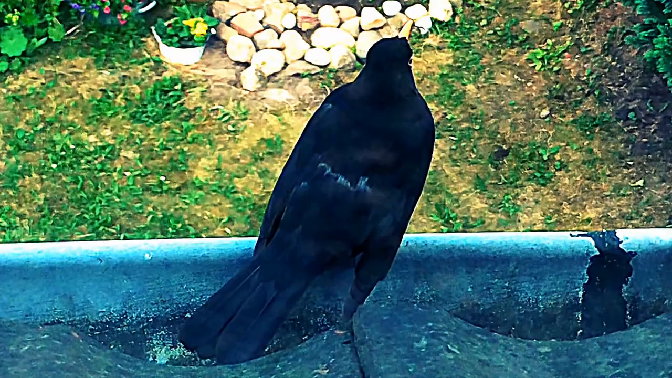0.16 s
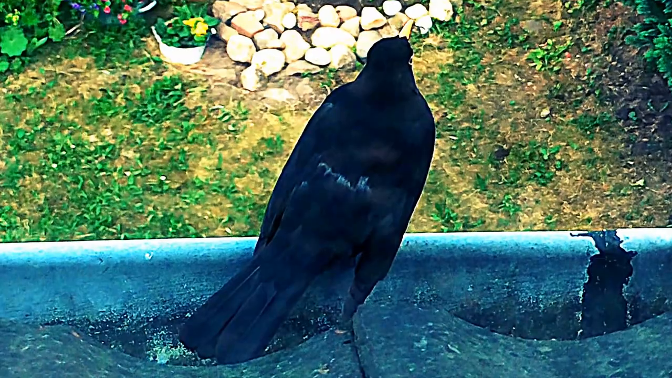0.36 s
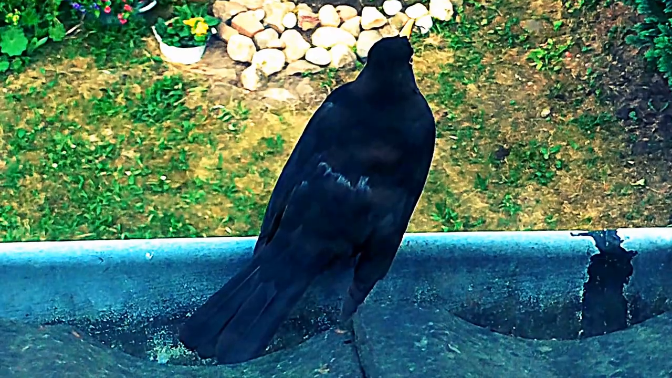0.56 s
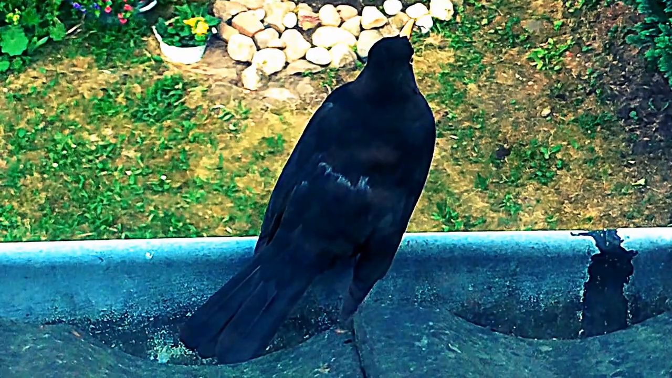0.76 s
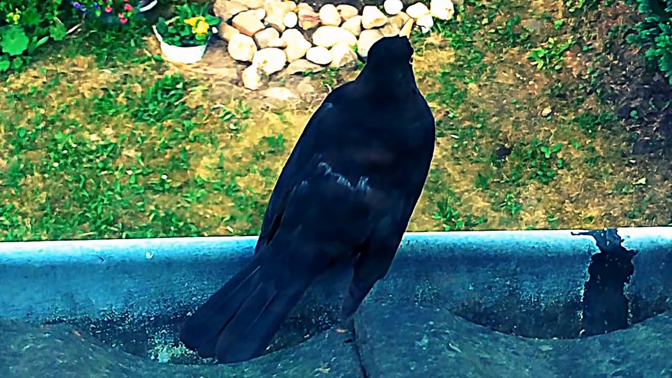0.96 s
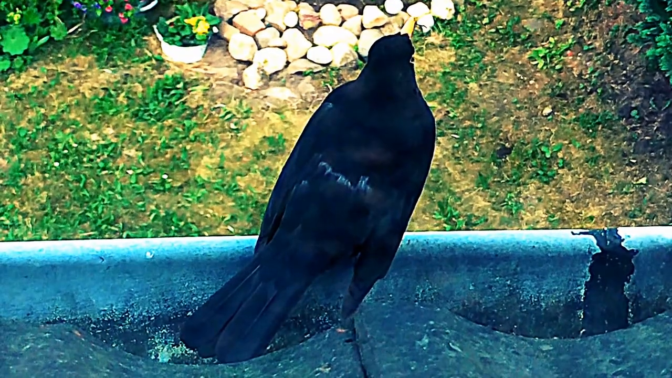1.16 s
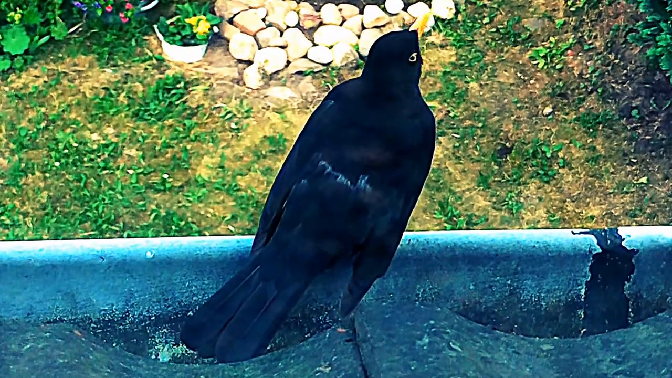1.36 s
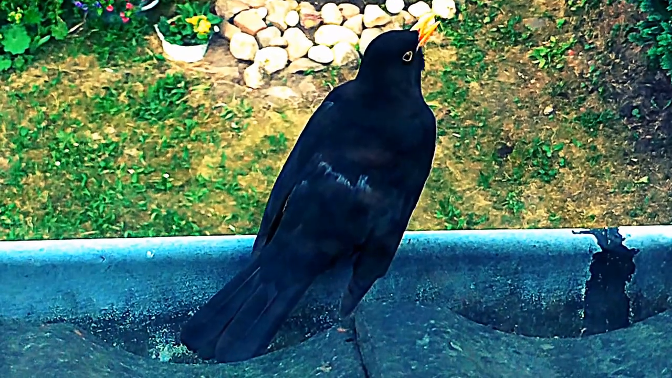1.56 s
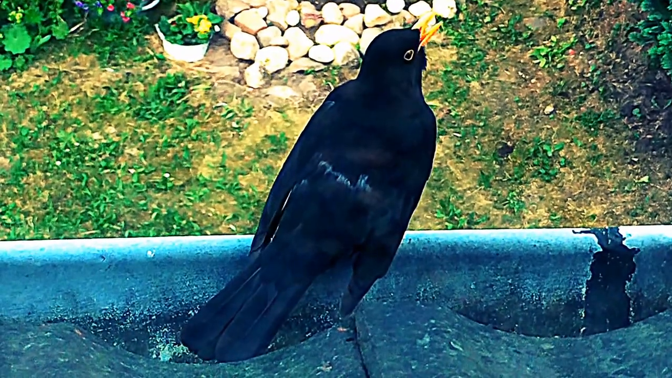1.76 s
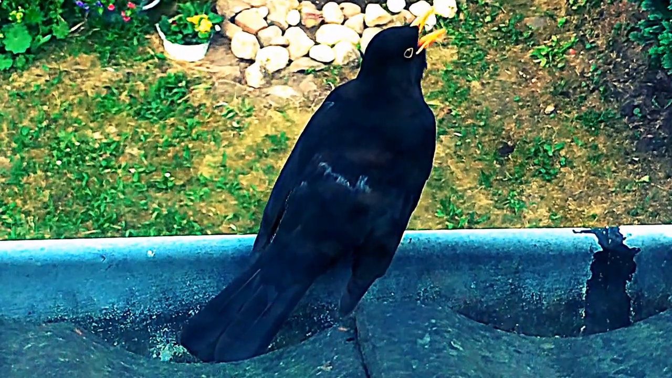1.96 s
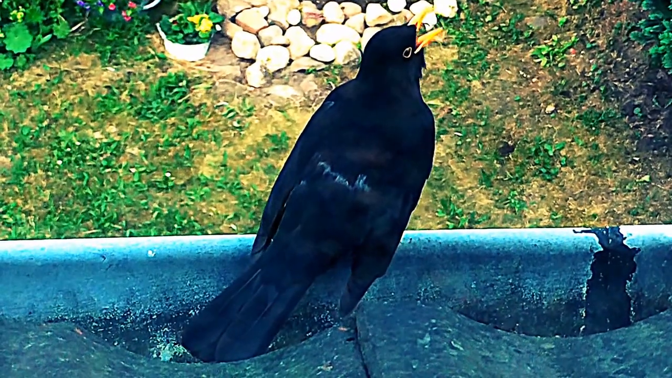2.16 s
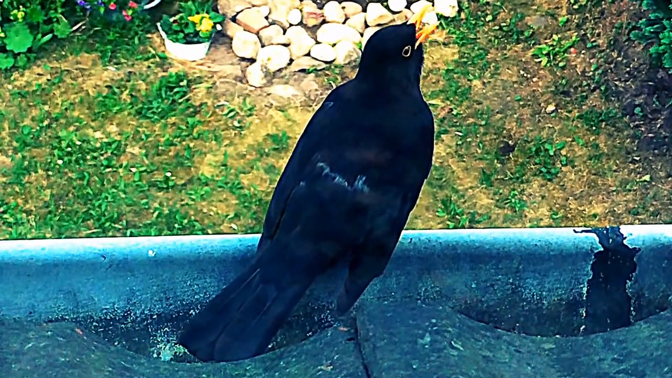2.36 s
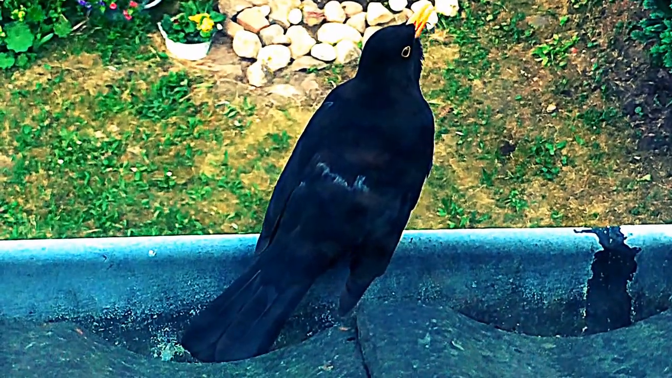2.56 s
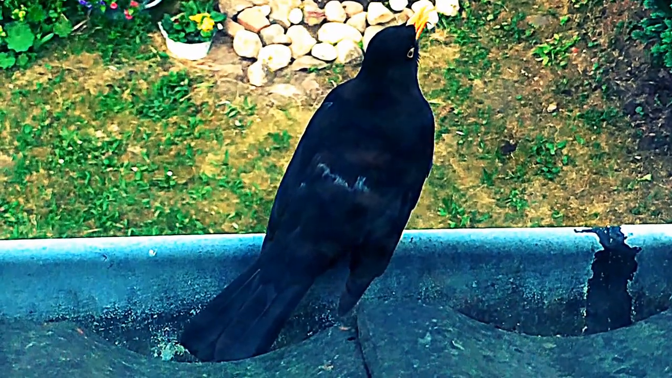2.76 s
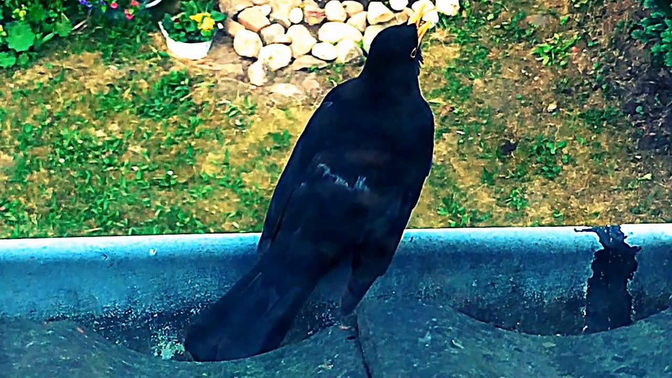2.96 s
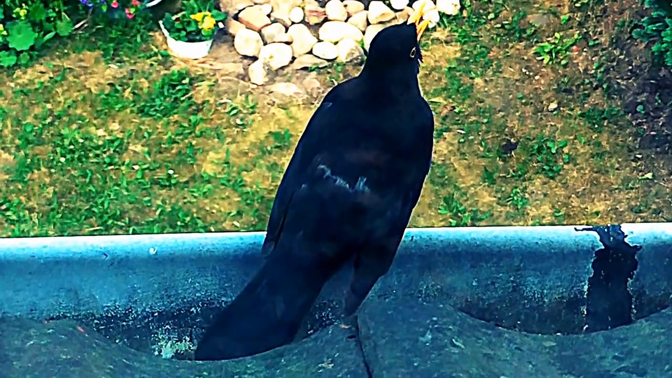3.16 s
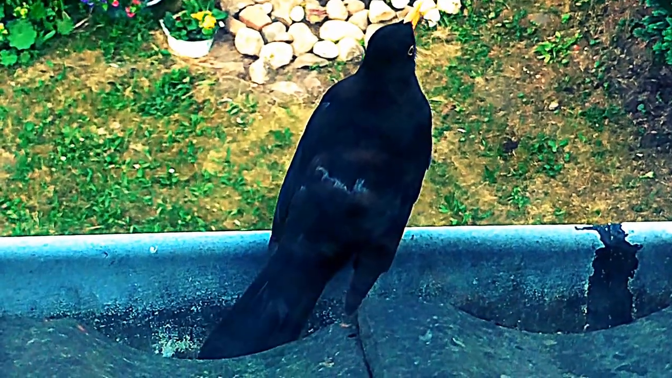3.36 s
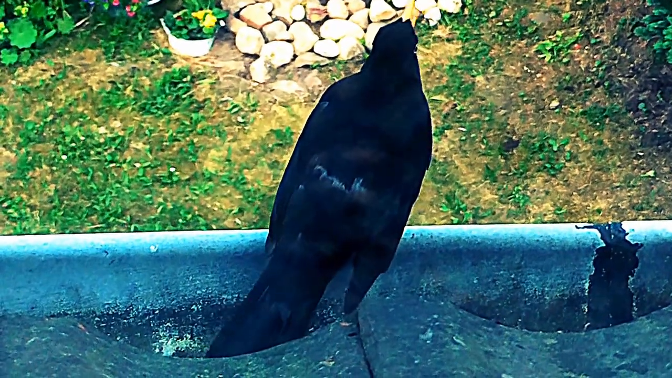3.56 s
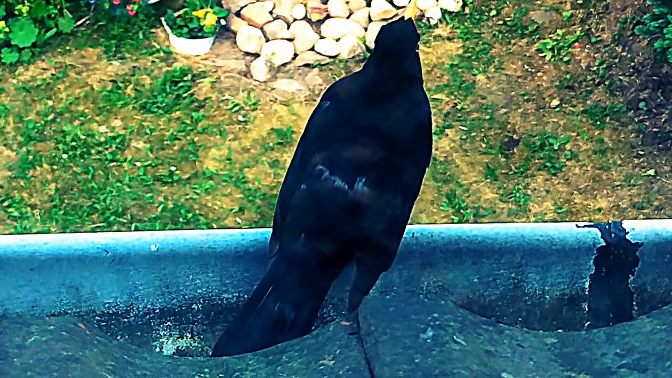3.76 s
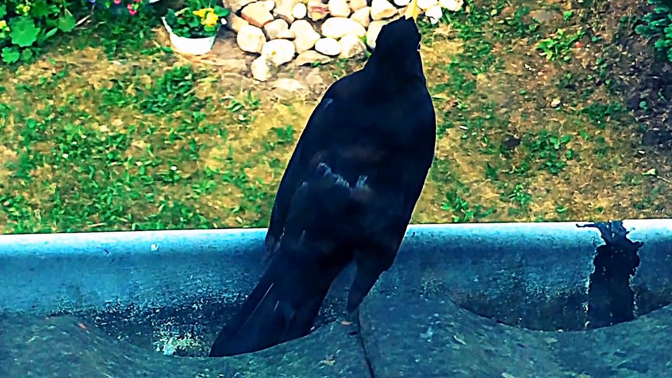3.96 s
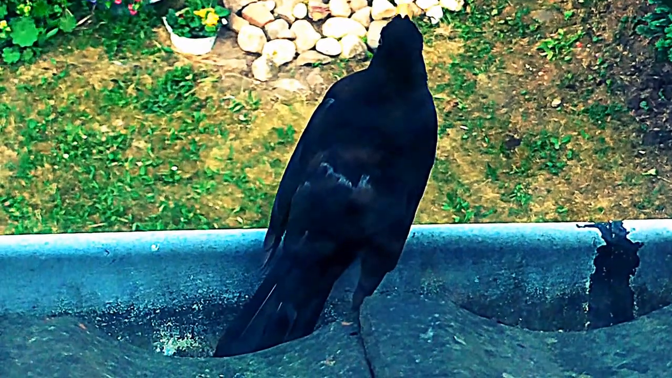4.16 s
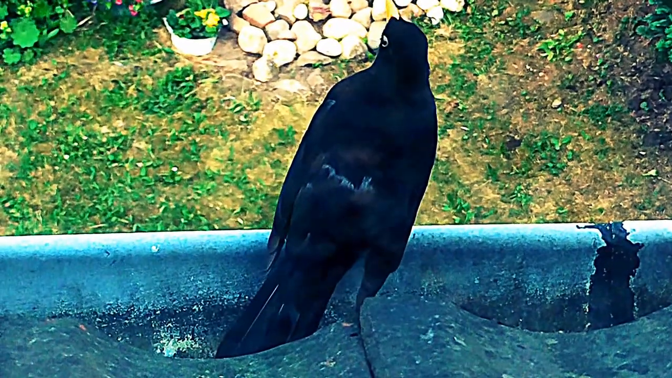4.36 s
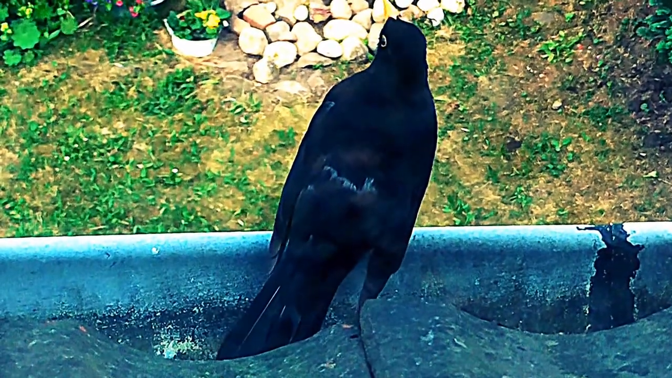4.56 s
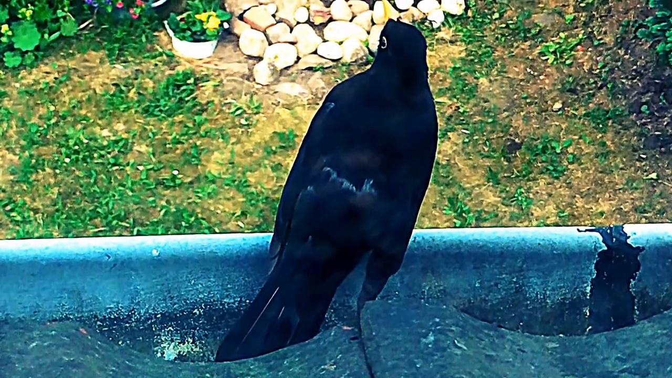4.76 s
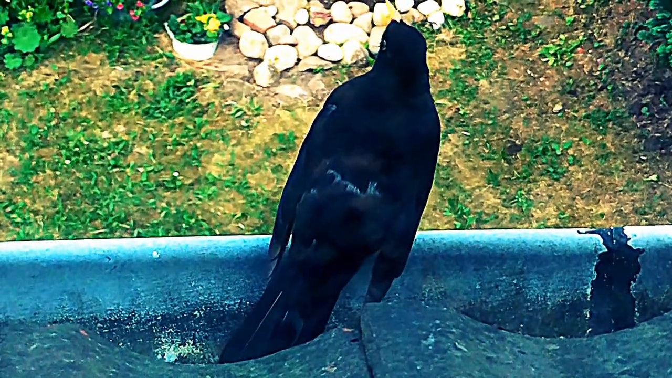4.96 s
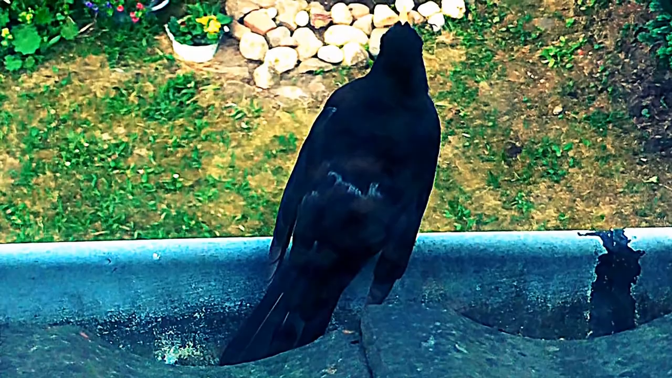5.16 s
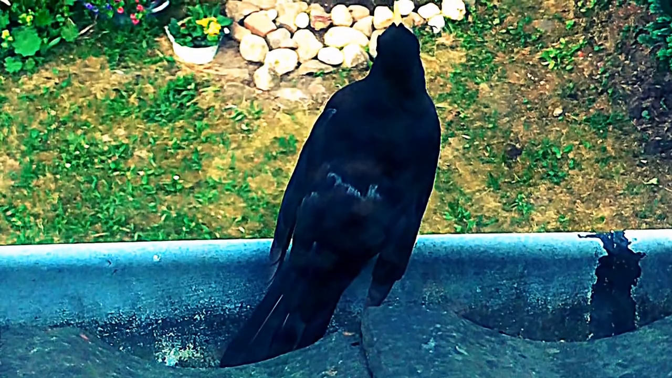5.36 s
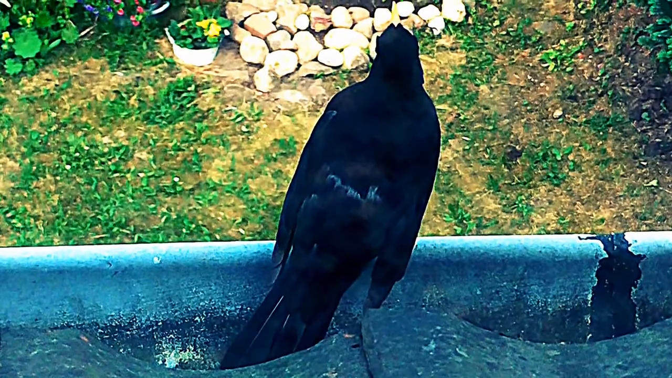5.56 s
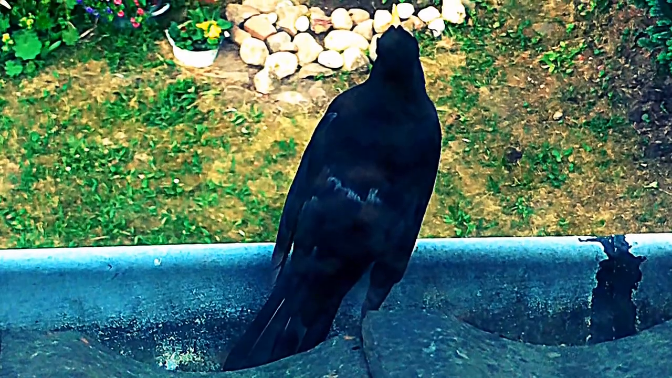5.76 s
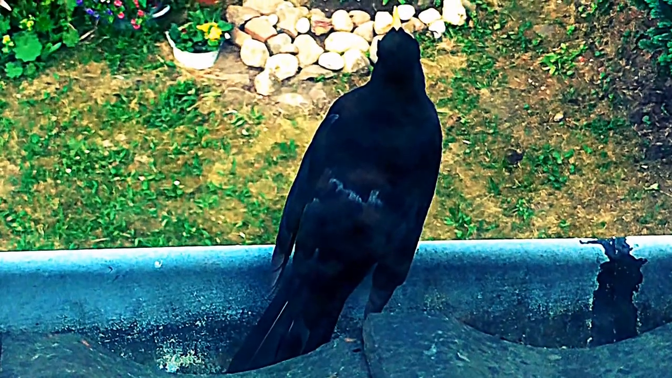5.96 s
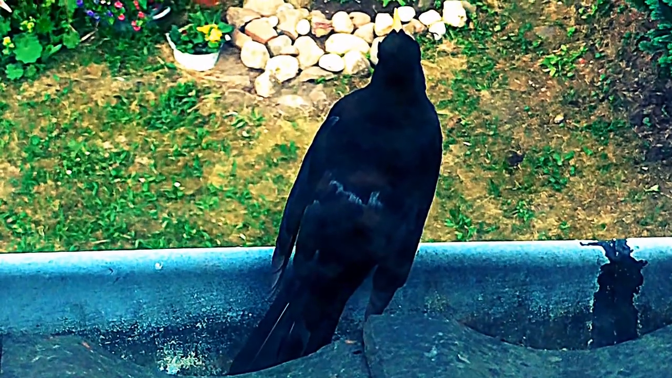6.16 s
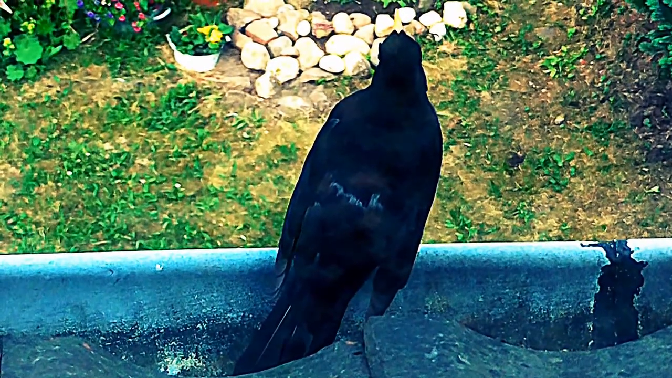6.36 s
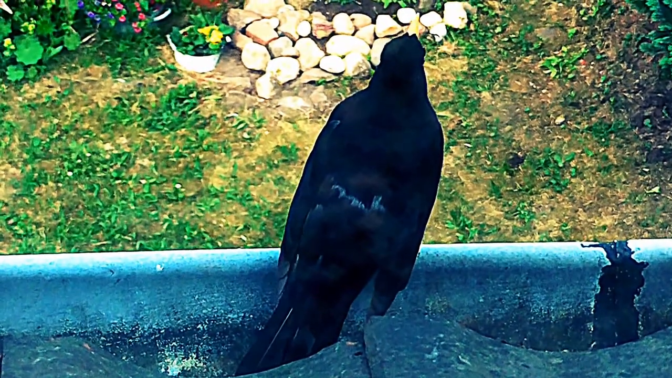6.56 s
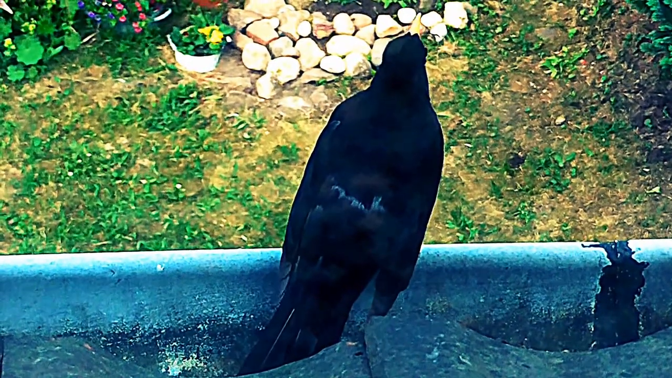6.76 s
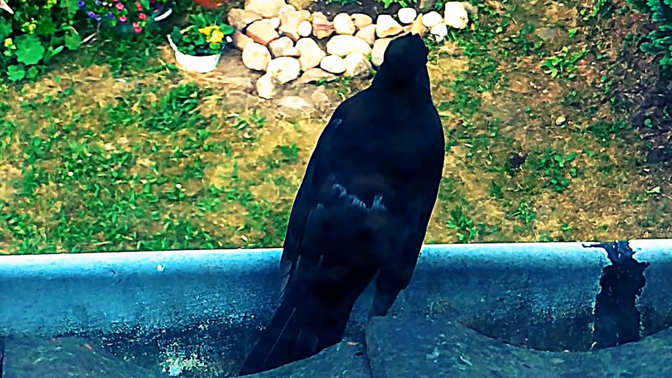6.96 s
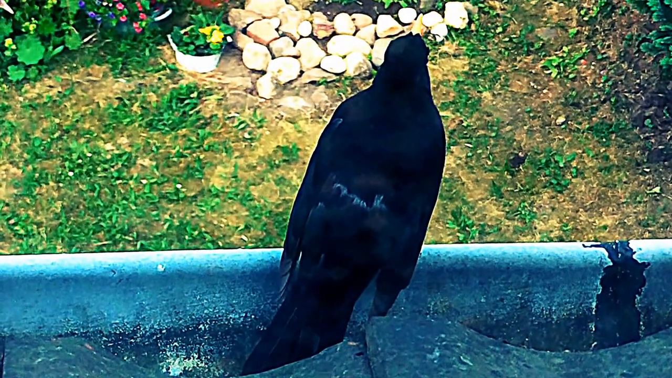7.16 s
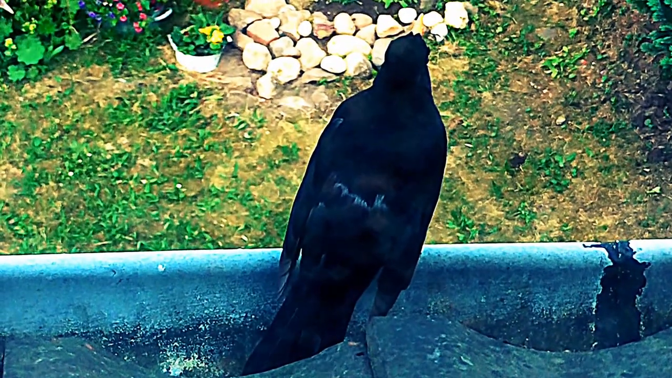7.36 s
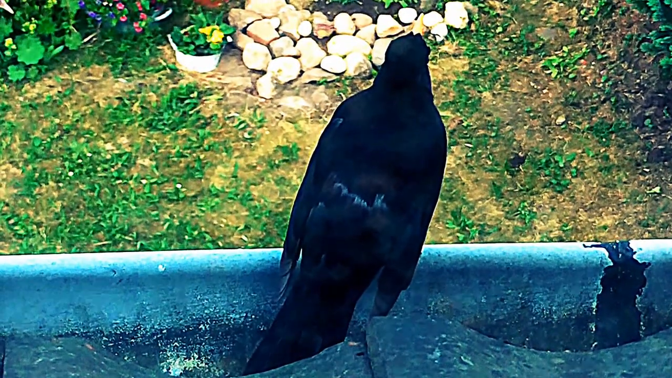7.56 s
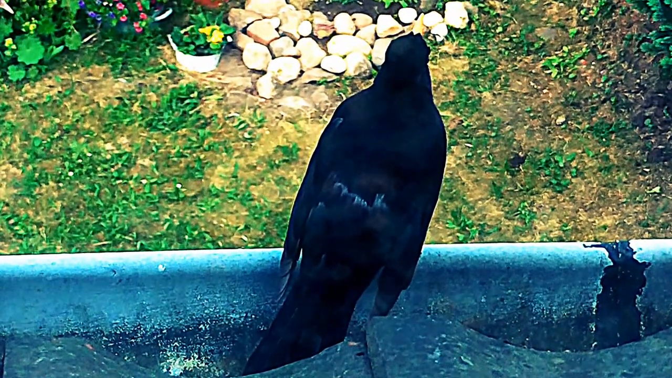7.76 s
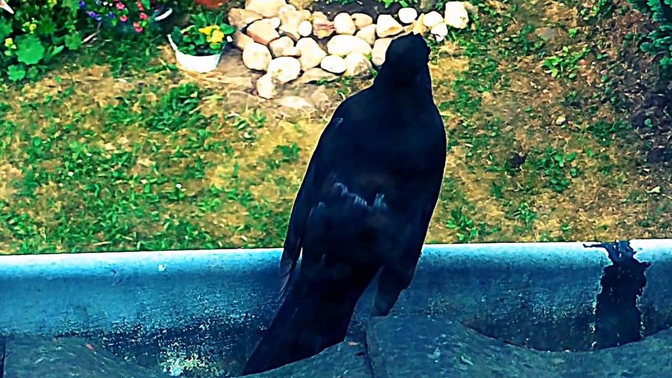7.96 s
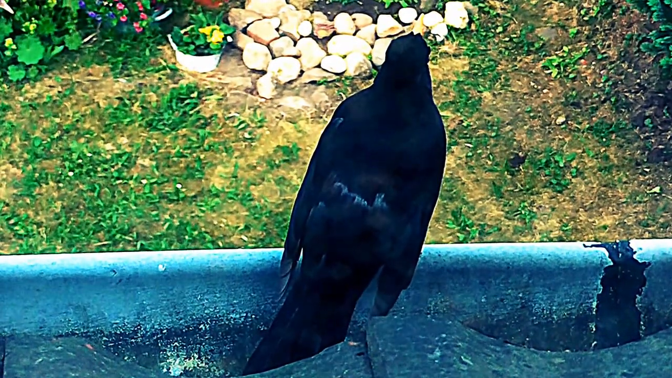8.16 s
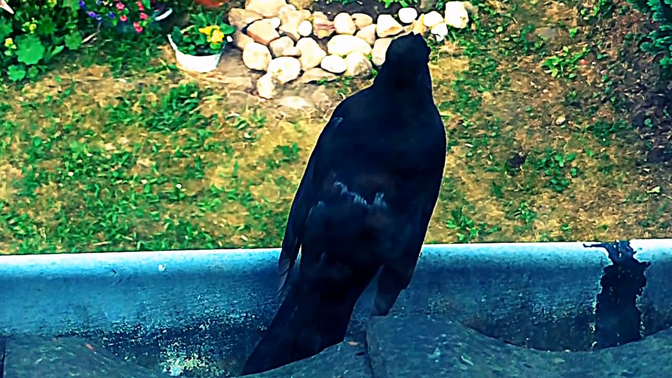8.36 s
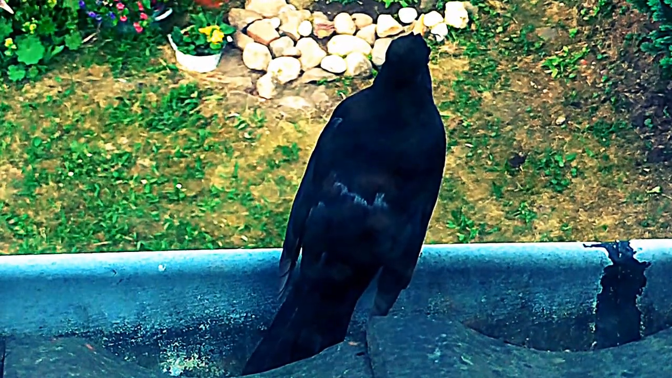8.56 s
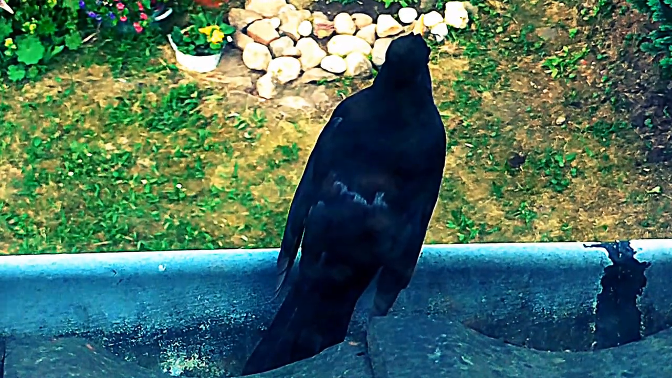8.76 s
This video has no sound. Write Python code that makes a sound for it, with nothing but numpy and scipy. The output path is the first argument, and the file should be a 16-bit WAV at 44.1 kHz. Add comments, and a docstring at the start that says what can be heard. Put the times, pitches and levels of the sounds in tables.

```python
"""A town rumbles throughout, and small birds chirp far off. After a second a blackbird on a roof gutter
sings low fluty whistles and warbles, then a thin twitter. At five seconds its second phrase opens with
soft creaks, turns fluty and twitters again. Faint notes and far chirps end the scene.
The two sides of the bird's voice organ, the syrinx, glide and trill to make the notes;
house walls smear each one into a ringing tail."""
import sys
import numpy as np
from scipy import signal
from scipy.fft import rfft, irfft, next_fast_len
from scipy.io import wavfile
from scipy.ndimage import uniform_filter1d

SR = 44100
rng = np.random.default_rng(int(sys.argv[2]) if len(sys.argv) > 2 else 0)


def int16_out(signal):
    """Quantize to a 16-bit WAV file."""
    q = np.round(np.clip(np.atleast_2d(signal).T, -1, 1) * 32767)
    wavfile.write(sys.argv[1], SR, q.astype(np.int16))


N = 388962
TIME = np.arange(N) / SR


def undb(db):
    """Turn decibels into a gain."""
    return 10 ** (np.asarray(db) / 20)


def wander(rate, size):
    """A smooth random wobble, about 1 in size, with `rate` new values a second."""
    hold = max(int(SR / rate), 1)
    steps = np.repeat(rng.standard_normal(size // hold + 1), hold)
    return 1.39 * uniform_filter1d(uniform_filter1d(steps, hold), hold)[:size]


def colour(x, points):
    """Turn lows and highs up or down along a curve of (f/Hz, level/dB) points."""
    hz, db = np.transpose(points)
    size = next_fast_len(len(x), True)
    f = np.maximum(np.fft.rfftfreq(size, 1 / SR), 1)
    return irfft(rfft(x, size) * undb(np.interp(np.log(f), np.log(hz), db)), size)[:len(x)]


# Traffic noise from low to high: f/Hz, relative level/dB
TRAFFIC_COLOUR = [(15, -35), (25, -7), (59, -2.5), (101, -7), (143, -3.5), (284, -10), (381, -5.5),
                  (815, -16), (1400, -36), (2280, -33.5), (2710, -38), (3300, -32), (3820, -39.5),
                  (5520, -36), (8800, -44.5), (11400, -73), (19400, -120)]
# How wide it sounds: f/Hz, relative level of the part that differs between the ears/dB
TRAFFIC_WIDTH = [(60, -11), (100, -8.5), (180, -6), (310, -6.5), (540, -5), (930, -2), (1620, 3),
                 (2800, -5), (4850, -0.5), (8390, 1)]
# Which way it leans: f/Hz, left minus right/dB
TRAFFIC_PAN = [(60, -0.5), (100, -9), (180, -1.5), (310, -4.5), (540, -1), (930, -2), (1620, -1.5),
               (2800, -0.5), (4850, -0.5), (8390, 0)]


def traffic(level_db=-49.58, width_db=-2):
    """Distant traffic: a steady rumble a little to the right, with a wide faint hiss on top."""
    mid = colour(rng.standard_normal(N), TRAFFIC_COLOUR)
    side = colour(rng.standard_normal(N), TRAFFIC_COLOUR)
    side = colour(side, TRAFFIC_WIDTH) * undb(width_db)
    ears = [colour(mid + sign * side, [(hz, sign * db / 2) for hz, db in TRAFFIC_PAN])
            for sign in (1, -1)]
    return np.array(ears) / np.std(mid) * undb(level_db)


# Engine hums: f/Hz, width/Hz, relative level/dB
ENGINE_BANDS = [(50.3, 8.2, -56.5), (74, 7, -55), (145.7, 20, -61), (340.3, 8.5, -60)]
# How they rise and fall: t/s, relative level/dB
ENGINE_SWELL = [(0, -1.5), (0.8, -2), (1.3, 1), (2.6, -2), (3.3, 1), (4.2, -3), (4.7, 2.5), (5.3, 1.5),
                (6.2, -1), (7.2, 3.5), (8.0, -4.5), (8.8, 3)]


def engines():
    """Far engines to the right: narrow bands of noise that swell together."""
    f = np.fft.rfftfreq(N, 1 / SR)
    bands = sum(undb(db) / np.sqrt(width) * np.exp(-((f - hz) / width) ** 2)
                for hz, width, db in ENGINE_BANDS)
    hum = irfft(rfft(rng.standard_normal(N)) * bands, N) * np.sqrt(SR / 2)
    swell = undb(np.interp(TIME, *np.transpose(ENGINE_SWELL)) - 1.5)
    return hum * swell * undb([[-2.2], [2.2]])


def scatter(fade):
    """Countless tiny echoes that fade away, returning all pitches about equally."""
    spectrum = rfft(rng.standard_normal(len(fade)) * fade)
    smooth_power = uniform_filter1d(np.abs(spectrum) ** 2, 35)
    return irfft(spectrum / np.sqrt(smooth_power), len(fade))[:-len(fade) // 10]


def wall_ring(x, level_db, t60_s, build_s, late_db, late_t60_s, spread):
    """Sound between houses builds up, dies fast and leaves a faint tail (t60: time to fall 60 dB)."""
    t = TIME[:SR]
    fade = 10 ** (-3 * t / t60_s) + undb(late_db) * 10 ** (-3 * t / late_t60_s)
    fade *= 1 - np.exp(-t / build_s)
    mid, side = scatter(fade), scatter(fade)
    ears = [signal.fftconvolve(x, mid + sign * spread * side)[:N] for sign in (1, -1)]
    return undb(level_db) * np.array(ears)


# Bounces off the roof and house fronts: delay/s, level/dB, left minus right/dB
HOUSE_ECHOES = [(0.0134, -12.5, 6), (0.0224, -11.5, -2.5), (.041, -14, 5.5), (.053, -25, 5),
                (.0585, -15, 0.5), (.1, -19.5, 4)]


def house_echoes(x):
    """Single echoes that beat against the gliding notes."""
    return sum(undb(db + np.array([[pan], [-pan]]) / 2) * np.interp(TIME - delay, TIME, x, left=0)
               for delay, db, pan in HOUSE_ECHOES)


def glide(row, settle, rise_db, sag_db, narrowing, widest=.026, arch=0):
    """The path of one note: the pitch slides, the level swells and sags, the trill opens and narrows."""
    start, length, first_hz, last_hz, db, crest, depth = row
    progress = np.linspace(0, 1, 41)
    hz = first_hz + (last_hz - first_hz) * np.expm1(-settle * progress) / np.expm1(-settle)
    hz *= 1 + arch * np.sin(np.pi * progress)
    swell = np.interp(progress, [0, crest, 1], [rise_db, 0, sag_db])
    opening = np.interp(progress, [0, widest, 1], [.5, 1, 1 - narrowing])
    return np.transpose([start + length * progress, hz, db + swell, depth * opening])


def syrinx(path, trill_hz, second_db, third_db, upper_db, rasp_db, waver=.0034, flutter_db=2):
    """One side of the voice organ vibrates along a path of (t/s, f/Hz, level/dB, trill depth/share)."""
    times, *columns = np.transpose(path)
    edge_s, grit = .002, 5
    span = np.flatnonzero((TIME > times[0]) & (TIME < times[-1] + edge_s))
    t, size = TIME[span], len(span)
    hz, db, depth = (np.interp(t, times, column) for column in columns)
    pace, drift, effort, shake = (wander(rate, size) for rate in (40.28, 150.8, 86.5, 688))
    trill = np.cos(2 * np.pi * np.cumsum(trill_hz * (1 + .116 * pace)) / SR)
    hz = hz * (1 + depth * trill + waver * drift)
    phase = 2 * np.pi * np.cumsum(hz) / SR
    # the windpipe, a tube closed at one end, favours the odd harmonics
    levels = [second_db, third_db] + [upper_db - 3.5 * (k - 5) - 6 * (k % 2 == 0) for k in range(4, 8)]
    # in hoarse notes the membranes close unevenly, which blurs the overtones
    hoarse = np.full(size, undb(rasp_db))
    blur = grit * hoarse * shake
    overtones = sum(undb(level) * np.sin(k * phase + np.sqrt(k) * blur) * (k * hz < SR / 2)
                    for k, level in enumerate(levels, 2))
    gate = np.clip(np.minimum(t - t[0], t[-1] - t) / (2 * edge_s), 0, 1)
    strength = undb(db + flutter_db * effort) * np.sin(np.pi / 2 * gate) ** 2
    return span, strength * np.array([np.sqrt(2) * np.sin(phase), np.sqrt(2) * overtones, hoarse])


# How the throat and open beak shape the overtones: f/Hz, level/dB
THROAT_COLOUR = [(1400, -6), (2400, -4.5), (3150, 2.5), (3700, -9), (4050, -7.5), (4400, -7.5), (4900, 0),
                 (5350, -3), (5800, -3.5), (6250, -2.5), (6600, -4), (7050, 4.5), (7500, -1.5),
                 (8800, -15.5)]
# The hiss in a hoarse voice: f/Hz, relative level/dB
RASP_HISS = [(600, -24.5), (1500, -6), (2800, 12.5), (3900, 11), (5400, 0.5), (6400, -3.5), (8500, -25)]


def throat(notes):
    """Join notes into a song: the throat colours their overtones, and hiss adds the rasp."""
    tracks = np.zeros((3, N))
    for span, parts in notes:
        tracks[:, span] += parts
    tone, overtones, rasp = tracks
    hiss = colour(rng.standard_normal(N), RASP_HISS)
    hiss /= np.sqrt(np.mean(hiss ** 2))
    return tone + colour(overtones, THROAT_COLOUR) + rasp * hiss


# Far calls, in the seven glide columns: t/s, length/s, first f/Hz, last f/Hz, relative level/dB,
# loudest point/share of length, trill depth/share of pitch
FAR_CHIRPS = [ (0.167, 0.05, 2620, 2180, -55, .6, 0.092), (0.434, 0.048, 2620, 2150, -54, 0.48, 0.1),
              (0.731, 0.034, 2166, 2030, -59, 0.76, 0.033), (3.947, 0.35, 1105, 1093, -60, 0.23, 0.0046),
              (8.415, 0.026, 3290, 3280, -61, .1, .01), (8.46, 0.203, 3760, 3900, -56.5, 0.38, 0.027),
              (8.692, 0.14, 3420, 3670, -61, .9, 0.018), (8.738, 0.094, 4510, 4550, -61, 0.72, 0.011), ]
# A thin, distant chorus: t/s, relative level/dB
FAR_CHORUS = [(0, -62), (.13, -65), (.35, -74), (.7, -85), (.95, -67.5), (1.5, -71), (2.3, -70.5),
              (2.901, -76), (3.6, -69.5), (7.6, -86.5), (7.85, -67), (8.1, -81), (8.8, -71)]


def far_birds(chorus_hz=3280, chorus_depth=.033):
    """Small birds in other gardens: single calls over one wavering tone for the chorus."""
    calls = [syrinx(glide(row, settle=1.7, rise_db=-4.5, sag_db=0, narrowing=.11),
                    trill_hz=42.1, second_db=-30, third_db=-49, upper_db=-65, rasp_db=-18.5)
             for row in FAR_CHIRPS]
    chorus = syrinx([(t, chorus_hz, db, chorus_depth) for t, db in FAR_CHORUS], trill_hz=51.5,
                    second_db=-14.5, third_db=-36.5, upper_db=-58, rasp_db=-30, waver=.012, flutter_db=3.5)
    return calls + [chorus]


# Fluty notes: the seven glide columns, 2nd harmonic/dB, 3rd harmonic/dB, upper harmonics/dB
WHISTLE_NOTES = [ (1.347, .046, 677, 771, -37, 0.36, .005, -18, -30.5, -35),
                 (1.407, 0.076, 1008, 1016, -26.5, 0.56, .005, -44, -36.5, -38),
                 (1.481, 0.07, 959, 939, -36, 0.76, 0.051, -42.5, -31.5, -35.5),
                 (1.915, 0.099, 1030, 1083, -22, 0.45, 0.018, -34.5, -35, -40.5),
                 (2.028, 0.08, 1083, 1077, -30.5, 0.46, .005, -40, -33.5, -42),
                 (2.104, .1, 1336, 1344, -30.5, 0.38, 0.0057, -27.5, -16.5, -43),
                 (2.198, 0.14, 1278, 1351, -30, 0.81, .02, -28, -14.5, -43),
                 (2.33, .2, 1341, 1312, -30.5, 0.35, 0.015, -31.5, -14.5, -42.5),
                 (2.571, .06, 1049, 987, -25, .5, .006, -33.5, -36.5, -39.5),
                 (2.63, 0.26, 978.7, 939.3, -24, 0.11, 0.0075, -40.5, -38.5, -32),
                 (2.975, .066, 1094, 1201, -27, 0.81, 0.017, -25.5, -26, -43),
                 (3.034, .045, 1259, 1462, -31.5, 0.61, .015, -21.5, -17, -38.5),
                 (5.956, .042, 1055, 1064, -28.5, 0.18, 0.029, -32, -38, -39),
                 (6.239, 0.12, 957, 957, -25.5, 0.62, 0.013, -32.5, -36, -35),
                 (6.294, 0.12, 1742, 1761, -44, 0.93, 0.011, -11.5, -16.5, -52),
                 (6.414, 0.13, 1356, 1308, -35, 0.24, 0.018, -23, -21, -34),
                 (7.653, .075, 2015, 1340, -51.5, 0.26, 0.023, -25, -30, -50), ]


def whistles():
    """The blackbird's low, nearly pure notes, with a slight quiver."""
    return [syrinx(glide(row, settle=2.6, rise_db=-8.5, sag_db=-11, narrowing=.1),
                   trill_hz=26.24, second_db=second, third_db=third, upper_db=upper, rasp_db=-48)
            for *row, second, third, upper in WHISTLE_NOTES]


# Rolling notes: columns as in WHISTLE_NOTES
WARBLE_NOTES = [ (1.671, 0.26, 1086, 1007, -32.5, 0.98, 0.2, -32, -35.5, -36.5),
                (1.68, 0.18, 1620, 1710, -63.5, .4, 0.095, -20.5, -19.5, -39),
                (3.074, 0.16, 1201, 1192, -27.5, 0.81, .15, -27, -26, -38),
                (3.213, 0.28, 1191, 1144, -27, 0.26, 0.047, -31, -25.5, -37.5),
                (5.987, .245, 1134, 1029, -29, 0.54, .1, -32.5, -33, -33),
                (7.723, .195, 1118, 1069, -47.5, .45, 0.15, -31, -41, -50),
                (8.568, .11, 1078, 1110, -56.5, 0.32, 0.09, -4.5, -10, -18), ]


def warbles():
    """Deep trills that open wide, then narrow toward a plain tone."""
    return [syrinx(glide(row, settle=.3, rise_db=-6, sag_db=-6, narrowing=.65, widest=.38, arch=.012),
                   trill_hz=34.87, second_db=second, third_db=third, upper_db=upper, rasp_db=-42.5)
            for *row, second, third, upper in WARBLE_NOTES]


# Reedy notes: columns as in WHISTLE_NOTES
CREAK_NOTES = [ (5.075, 0.092, 639, 653.4, -43, .6, 0.01, -5, -1, -16),
               (5.213, .135, 996, 760, -45.5, 0.11, 0.015, 4, -7.5, -10),
               (5.335, .095, 772, 765, -42, 0.13, 0.019, -6, -22, -17),
               (5.435, .085, 764, 736.5, -36, 0.62, .01, -10.5, -25.5, -28),
               (5.515, .195, 720.4, 608.7, -40.5, .25, 0.036, -16.5, -22, -26),
               (5.531, .12, 1226, 1150, -50, 0.17, .035, -25, -36, -17.5),
               (5.665, 0.14, 1142, 1111, -44.5, 0.24, 0.015, -30, -33, -27.5),
               (5.918, 0.04, 877, 850, -45.5, 0.079, 0.0054, -7.5, -19.5, -29), ]


def creaks():
    """Soft notes, rich in overtones, that mostly slide downward."""
    return [syrinx(glide(row, settle=4.2, rise_db=-6, sag_db=-4, narrowing=.1),
                   trill_hz=26.26, second_db=second, third_db=third, upper_db=upper, rasp_db=-31.5)
            for *row, second, third, upper in CREAK_NOTES]


# High twitter: the seven glide columns, 2nd harmonic/dB, 3rd harmonic/dB, rasp/dB
BUZZ_NOTES = [ (3.073, 0.047, 1927, 2155, -51, 0.37, 0.067, 7.5, -37, -32),
              (3.655, .13, 3038, 3270, -33.5, 0.86, 0.026, -12.5, -41, -33),
              (3.773, .09, 3150, 3058, -40, 0.34, 0.09, -9.5, -39, -31),
              (4.118, 0.084, 2885, 3056, -42, 0.46, 0.019, -14, -47, -30),
              (4.233, 0.06, 2600, 2585, -41.5, 0.3, .012, -7.5, -26, -23),
              (6.657, .04, 2020, 3080, -44.5, 0.73, 0.17, -21, -47, -26),
              (6.67, 0.1, 2284, 1953, -33, 0.4, 0.051, -32, -23.5, -17),
              (6.701, 0.13, 3286, 3790, -42, 0.38, 0.15, -25, -47, -19),
              (6.881, 0.11, 2305, 2393, -38.5, 0.15, .06, -35, -49, -17),
              (6.86, 0.112, 3174, 3295, -38.5, .6, 0.032, -20.5, -40, -26),
              (6.855, .11, 5700, 5630, -52.5, 0.083, .04, -50, -60, -20),
              (7.44, .1, 3010, 2953, -45.5, 0.16, 0.038, -20, -42, -24),
              (7.481, .14, 2526, 2678, -44, 0.36, 0.026, -9.5, -35, -27),
              (7.555, 0.097, 3293, 3404, -42, 0.13, .14, -21, -44, -22), ]


def buzzes():
    """Hoarse notes, often two at once, trilled so fast that they buzz."""
    return [syrinx(glide(row, settle=2.4, rise_db=-7, sag_db=-10.5, narrowing=.32),
                   trill_hz=77.8, second_db=second, third_db=third, upper_db=-54, rasp_db=rasp)
            for *row, second, third, rasp in BUZZ_NOTES]


# Sharp chips: t/s, length/s, top f/Hz, dip f/Hz, held f/Hz,
# first level/dB, held level/dB, last level/dB (all three relative), 2nd harmonic/dB, rasp/dB
CHIP_NOTES = [ (4.144, .084, 3080, 1857, 2570, -31, -37, -31, -22.5, -25),
              (4.238, 0.08, 2620, 1458, 2247, -27.5, -23, -28, -28, -26),
              (4.32, 0.07, 2283, 1732, 1880, -20, -31.5, -47, -12.5, -19.5),
              (6.839, 0.048, 1127, 1079, 2345, -42.5, -34, -38, -29, -17), ]


def chips(dive_s=.011, spring_s=.016, dip_db=-11.5, depth=.026):
    """The pitch dives, the voice thins at the bottom, then springs back to a held tone."""
    notes = []
    for start, length, top_hz, dip_hz, held_hz, first_db, held_db, last_db, second, rasp in CHIP_NOTES:
        path = [(start, top_hz, first_db, 0),
                (start + dive_s, dip_hz, first_db + dip_db, 0),
                (start + dive_s + spring_s, held_hz, held_db, depth),
                (start + length, held_hz, last_db, depth / 2)]
        notes.append(syrinx(path, trill_hz=69.7, second_db=second, third_db=-49, upper_db=-59,
                            rasp_db=rasp))
    return notes


# Three stuttering pips: t/s, length/s, relative level/dB
PIP_NOTES = [(7.422, 0.015, -44), (7.466, 0.017, -38.5), (7.508, 0.015, -35)]


def pips(hz=2003, fade_db=-9):
    """Tiny fading notes on one pitch."""
    return [syrinx([(start, hz, db, 0), (start + length, hz, db + fade_db, 0)],
                   trill_hz=0, second_db=-29, third_db=-30, upper_db=-50, rasp_db=-21)
            for start, length, db in PIP_NOTES]


def scene(near_db=-7, far_db=-6):
    """The town, the far birds and the blackbird, heard among the houses."""
    town = traffic() + engines()
    song = throat(whistles() + warbles() + creaks() + buzzes() + chips() + pips())
    chirps = throat(far_birds())
    song_ring = wall_ring(song, level_db=-6, t60_s=.43, build_s=.0038,
                          late_db=-26, late_t60_s=1.55, spread=.54)
    chirp_ring = wall_ring(chirps, level_db=-5.5, t60_s=.42, build_s=.01,
                           late_db=-17.5, late_t60_s=2.1, spread=.6)
    neighbours = undb(far_db) * chirps + chirp_ring
    blackbird = undb(near_db) * song + house_echoes(song) + song_ring
    return town + neighbours + blackbird


def record(dry, top_hz=8850):
    """Cut the highest treble steeply."""
    return signal.sosfilt(signal.ellip(10, .2, 70, top_hz, fs=SR, output="sos"), dry)


dry = scene()
out = record(dry)
int16_out(out)
```